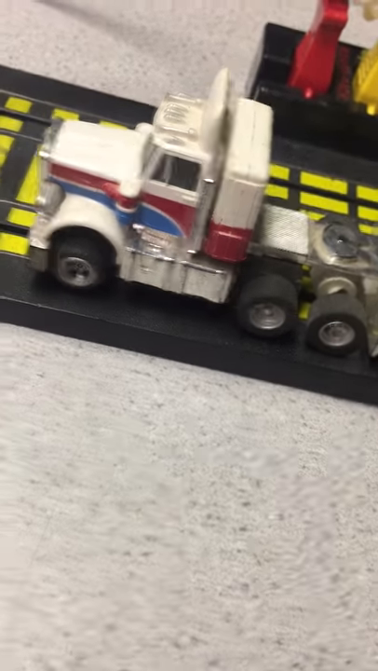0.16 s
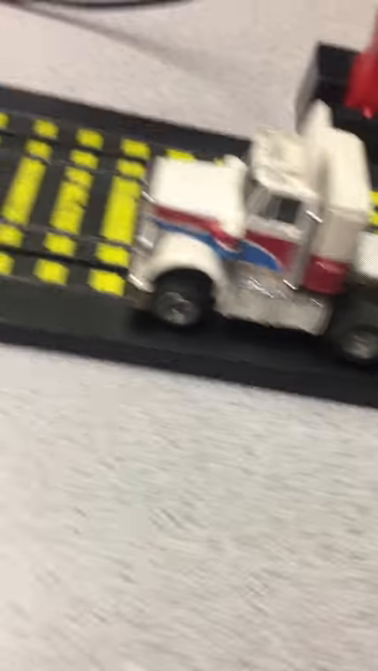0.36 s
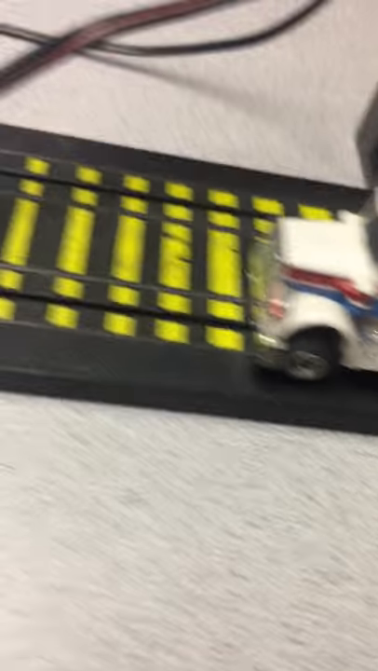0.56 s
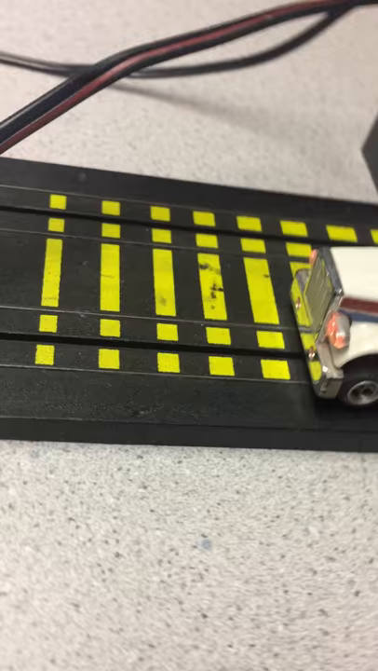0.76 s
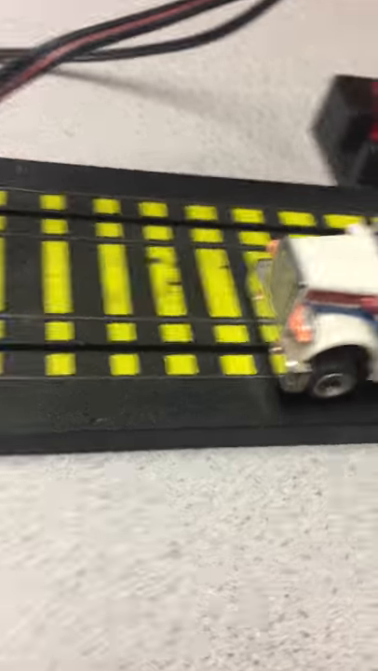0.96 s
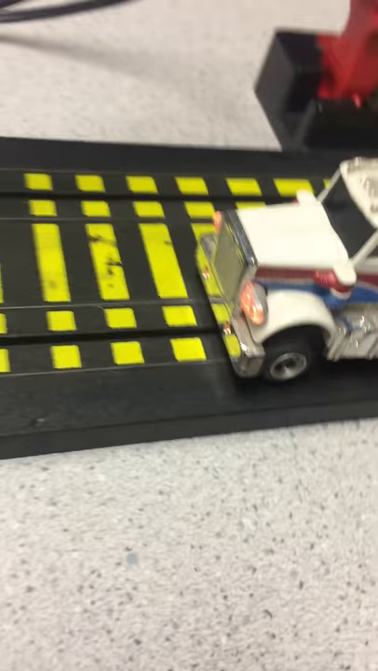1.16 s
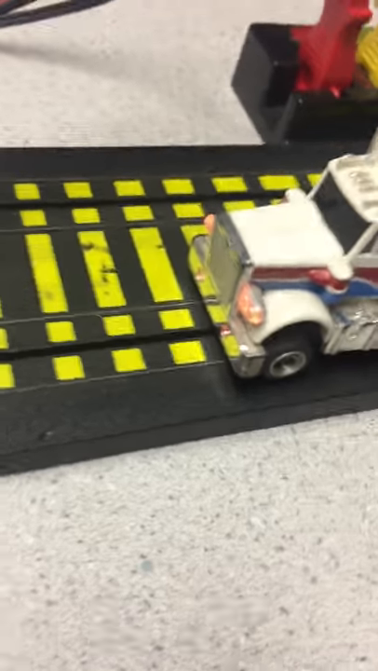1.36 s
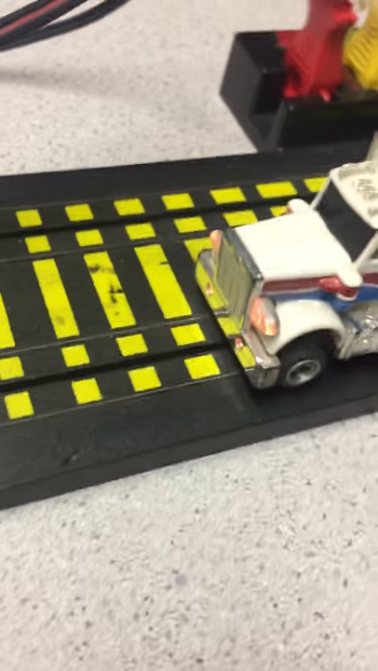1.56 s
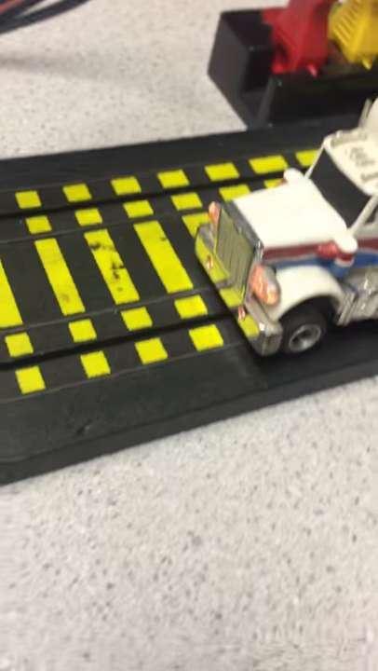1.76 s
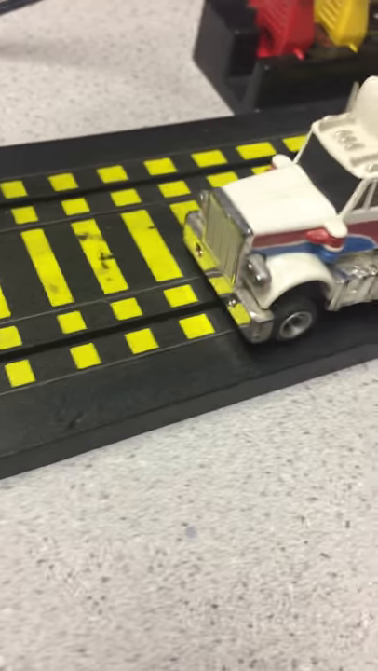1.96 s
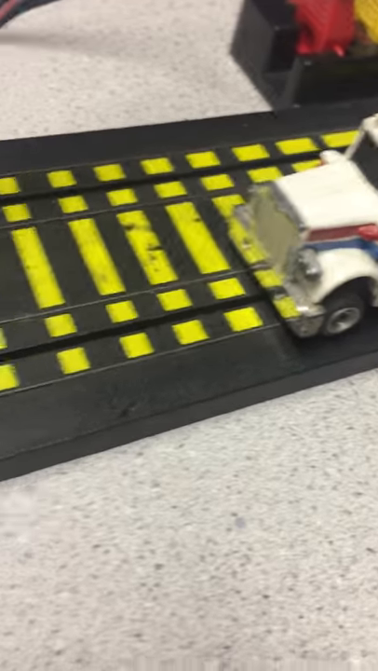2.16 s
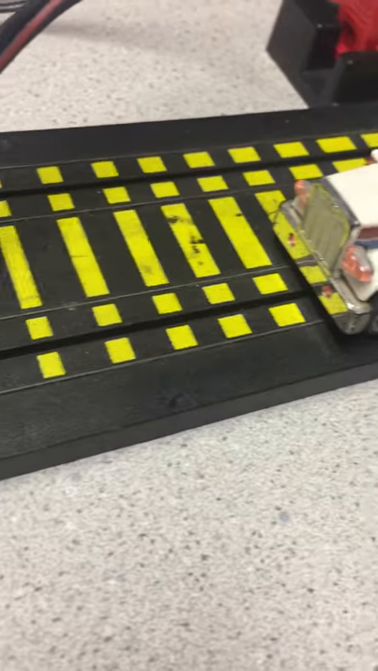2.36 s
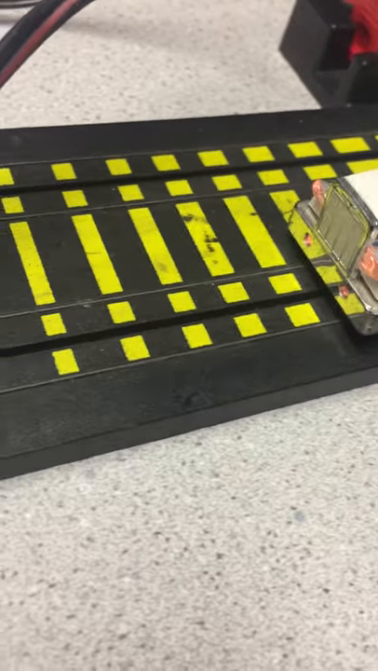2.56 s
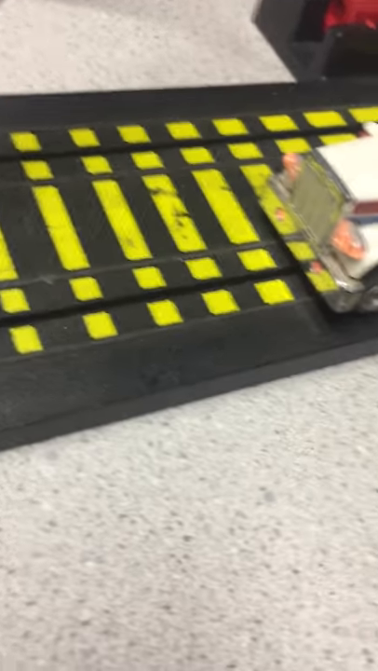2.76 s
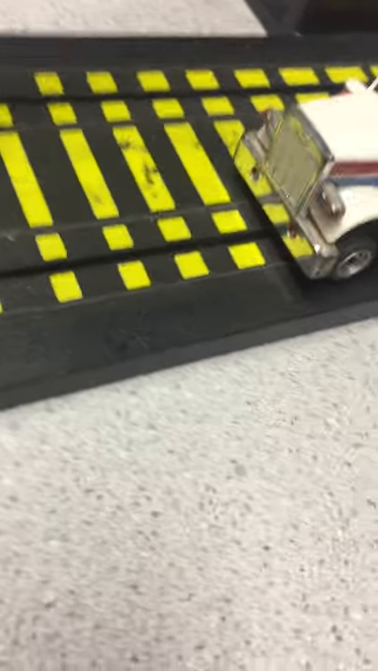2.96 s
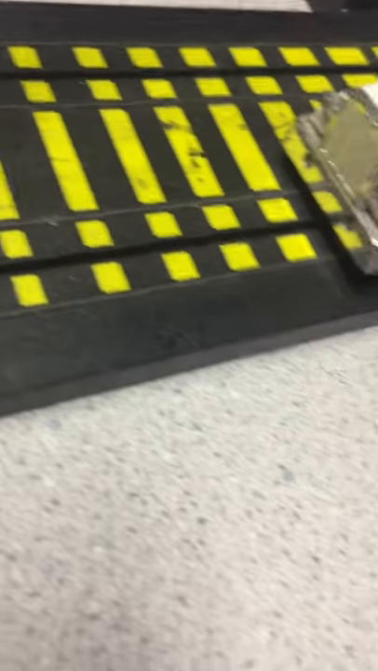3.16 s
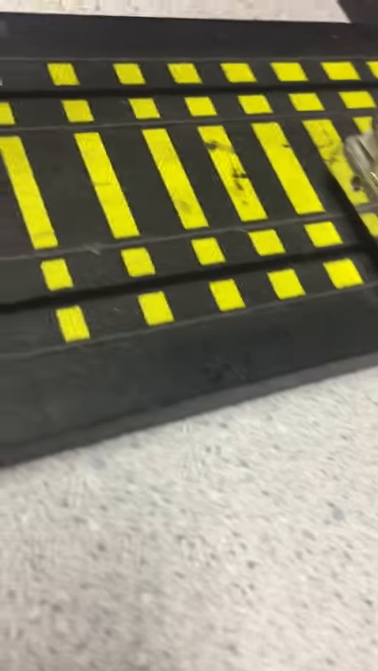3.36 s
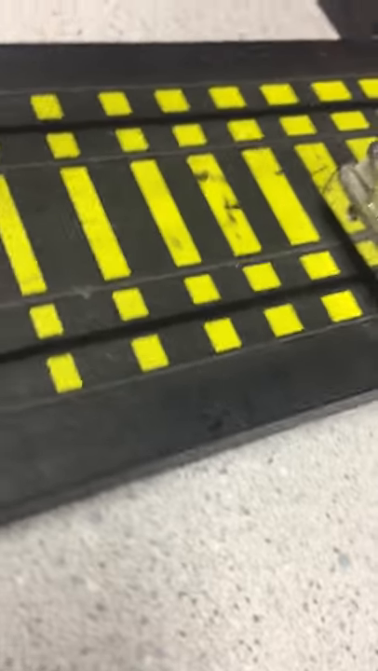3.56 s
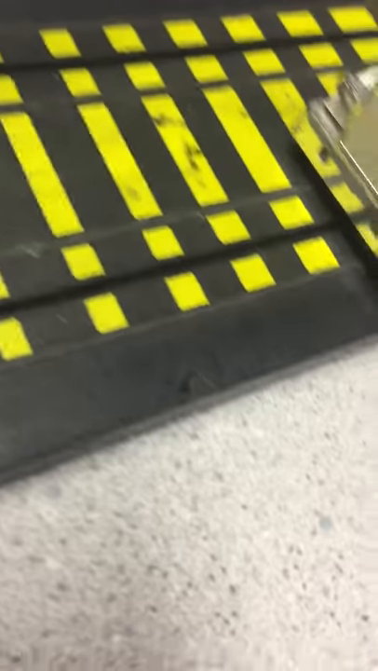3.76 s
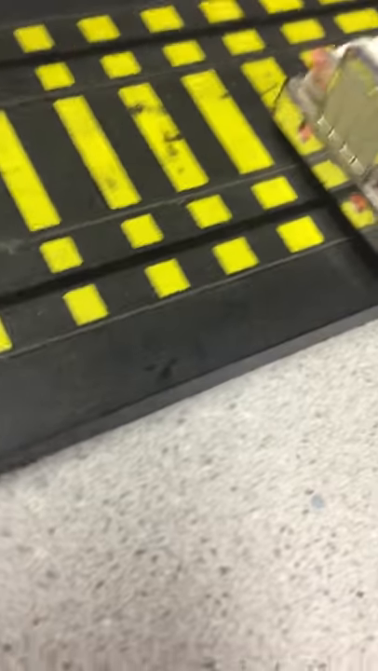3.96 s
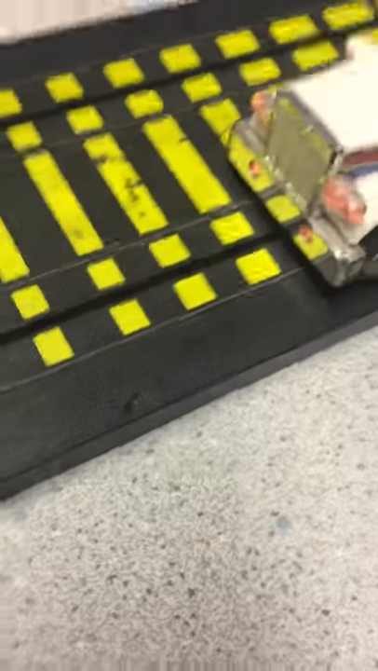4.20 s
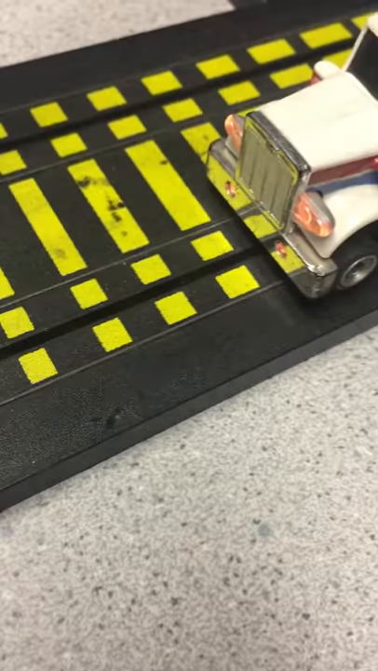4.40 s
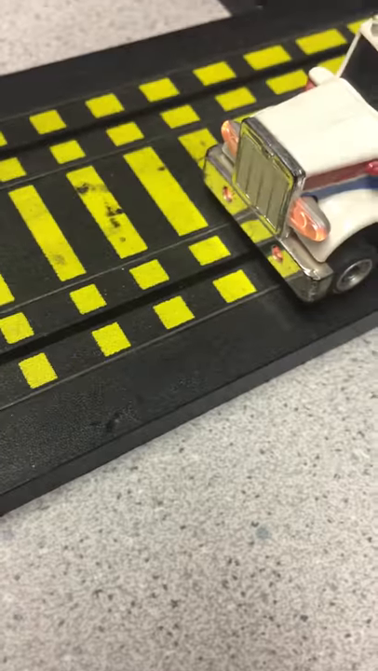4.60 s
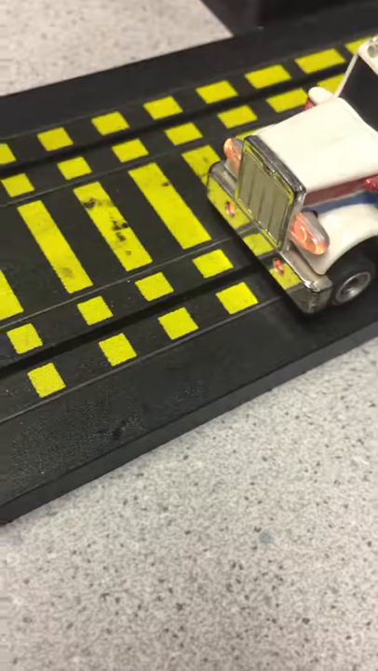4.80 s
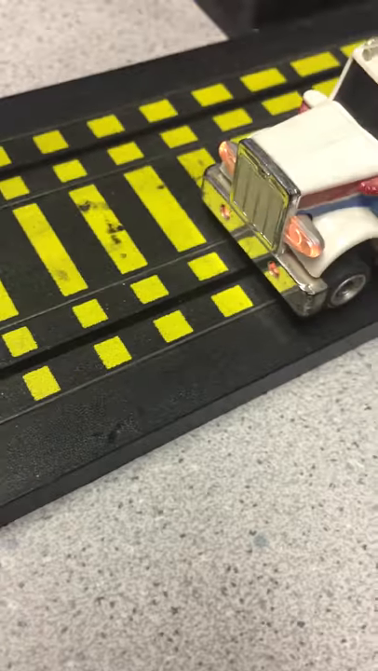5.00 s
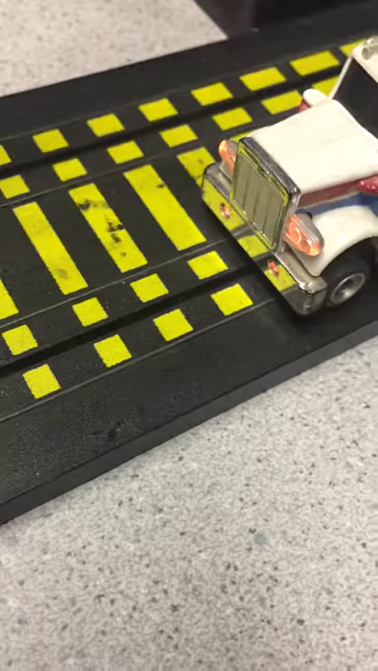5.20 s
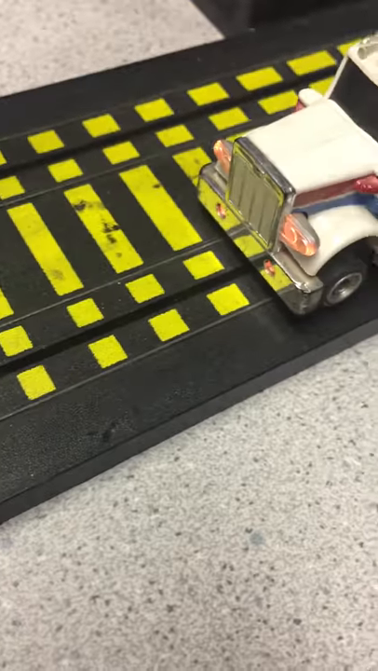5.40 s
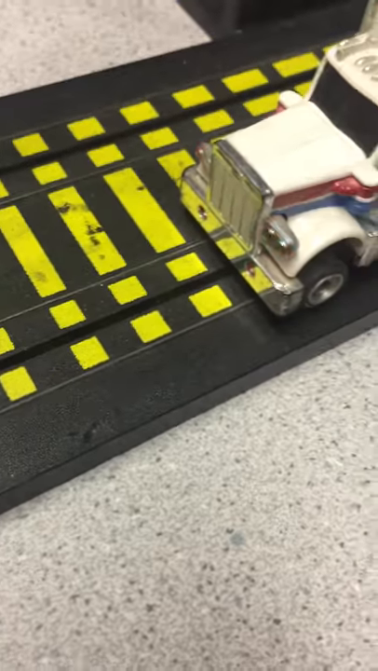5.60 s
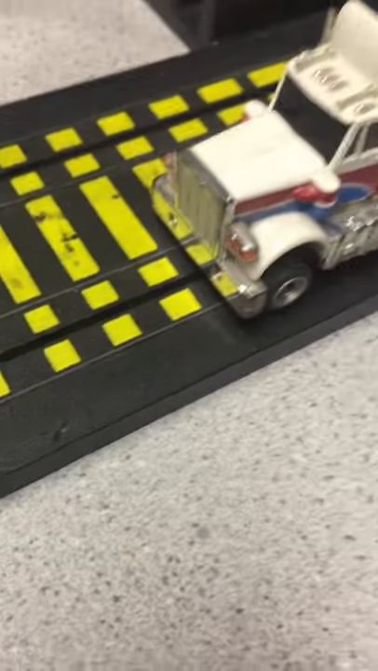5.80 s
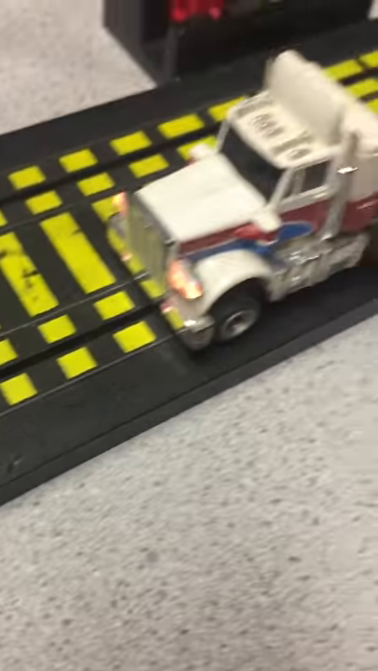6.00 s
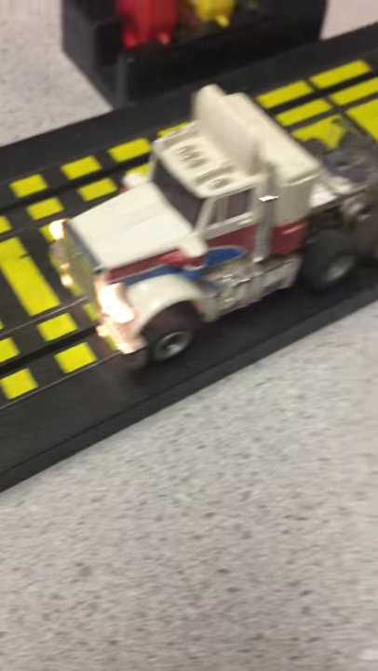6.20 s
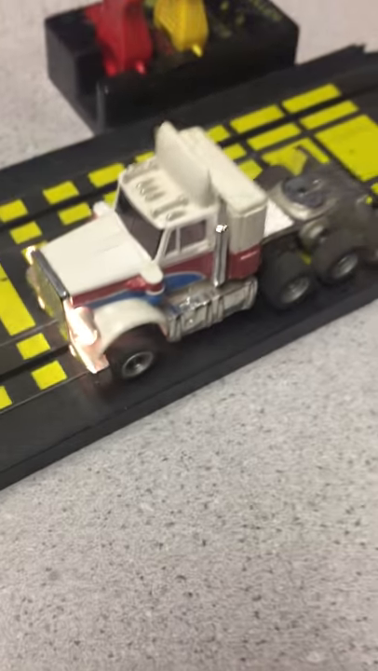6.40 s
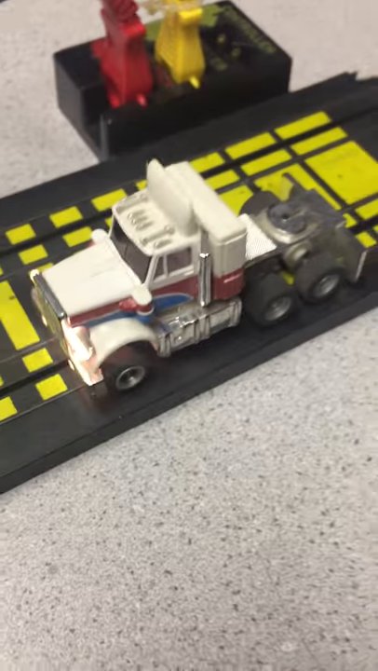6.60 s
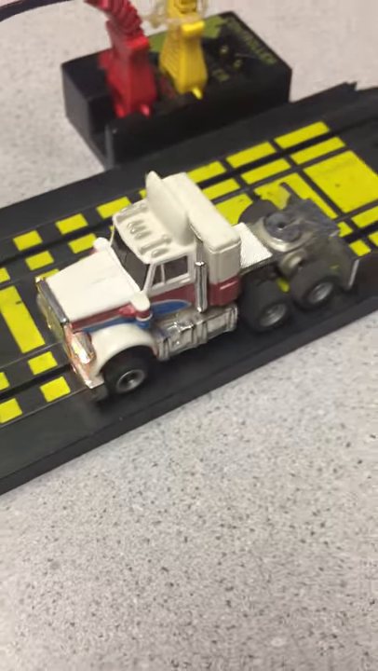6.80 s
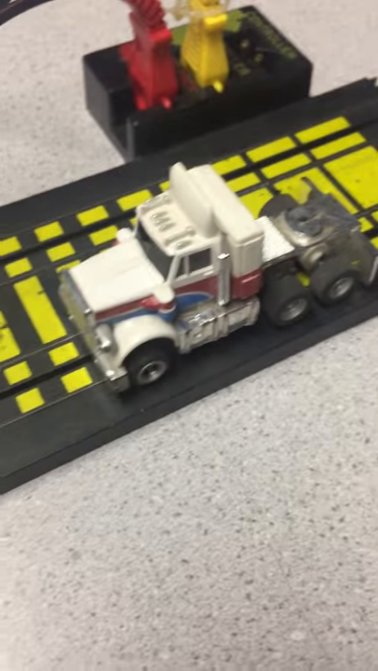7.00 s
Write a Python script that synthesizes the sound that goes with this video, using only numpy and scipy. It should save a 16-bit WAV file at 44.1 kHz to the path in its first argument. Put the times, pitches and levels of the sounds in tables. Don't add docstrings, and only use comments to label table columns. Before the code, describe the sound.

Close phone microphone, dry indoor sound. A tiny motor and loose plastic gears make a dry, noisy, bright rattle in five bursts, each spinning up fast and coasting down into slower ticking. Between bursts there is near silence with light gear taps, faint rubbing, one knock and a low creaking. Soft hiss and rumble lie underneath.

```python
import sys
import numpy as np
from scipy import signal
from scipy.fft import rfft, irfft, next_fast_len
from scipy.io import wavfile
from scipy.ndimage import uniform_filter1d, map_coordinates

SR = 44100
rng = np.random.default_rng(int(sys.argv[2]) if len(sys.argv) > 2 else 0)


def transcribe(u):
    v = np.clip(np.atleast_2d(u).T, -1, 1)
    q = np.round(v * 32767).astype(np.int16)
    wavfile.write(sys.argv[1], SR, q)


def ratio_of_db(decibels):
    return 10 ** (np.asarray(decibels, float) / 20)


N = 310921
T = np.arange(N) / SR

# (wheels grip [s], power off [s], standstill [s], spin-up time [s], free-spin speed [0-1])
RUNS = [
    (0.027, 0.199, 0.32, 0.21, 0),
    (0.658, 1.952, 2.1, 0.22, 0.03),
    (2.393, 2.996, 3.213, 0.18, 0.01),
    (3.996, 5.603, 5.792, 0.24, 0.01),
    (5.937, 6.96, 7.355, 0.25, 0),
]
# (shell at full speed [dB], then re shell: boom, chassis, fizz [dB])
FACING = [(-31.5, -7.5, -8, 1.5), (-31, -10.5, -9.5, -1), (-30, -10.5, -9, -0.5), (-32.5, -11, -5, 0.4),
          (-27.5, -12, -5, 2)]
# (frequency [Hz], width [Hz], level [dB])
BODY_MODES = [
    [(620, 67, -18), (882, 36, -3.5), (1210, 25, -3), (1470, 81, -3), (2350, 110, 0), (3480, 250, 0.5),
     (4100, 55, 1.5)],
    [(334, 8.1, -4), (611, 45, 3), (855.6, 31, 4.5), (1208, 37, -6.5), (1467, 64, -2), (2460, 300, -5.5),
     (3470, 140, 2)],
    [(622, 39, -0.5), (871, 25, 1.5), (1215, 48, -6.5), (1468, 46, -1.0), (2340, 200, -6.0),
     (3510, 90, 3.0)] + [(344, 30, -24)],
    [(208, 47, -15.5), (637, 48, -6.5), (867.0, 25, -1.5), (1183, 116, -8.0), (1477, 31, -3.0),
     (1970, 24, -10.0), (3490, 130, -1.5)] + [(331.6, 18, -13.0), (2700, 880, -16)],
    [(213.3, 49, -14.5), (640, 45, -9.0), (861, 30, -1.5), (1200, 116, -5.0), (1465, 54, -1),
     (1840, 75, -10.5)] + [(347, 31, -15), (3490, 180, -1.5), (4570, 140, -7.5)],
]
# (frequency [Hz], width [Hz], level [dB])
PLATE_BOOM = (198, 44, -22)
# (frequency [Hz], level [dB])
BROAD_BASE = [(60, -66), (150, -33), (400, -34), (560, -8.5), (1000, -29.5), (2000, -11), (3200, -8),
              (4500, -13.5), (8000, -14), (10000, -14), (12000, -18), (14000, -19.5), (16000, -17.5)]
# (frequency [Hz], width [Hz], gain [dB])
NOTCHES = [(992, 55, 5), (1678, 180, -4.5), (4825, 340, -7.5), (10240, 520, -5)]
EDGES_HZ = [130, 1000, 2300, 4800, 20000]
# (time [s], peak level [dB])
SNAPS = [(0.058, -27), (0.0982, -35), (0.1658, -24), (0.6624, -35), (2.396, -36), (2.4575, -21),
         (2.4793, -21), (2.5298, -18.5), (2.808, -17), (3.0062, -15.5), (4.0, -39), (4.0467, -24),
         (4.115, -17), (6.008, -27), (6.0666, -19), (6.2912, -9.5), (6.331, -24)]
# (time [s], level over the rattle
# [dB])
BITES = [(-0.0005, 8), (0.1865, 1), (0.7424, 9.5), (0.8004, 9), (0.8241, 10), (0.8609, 6.5), (0.9224, 8),
         (0.971, 3), (1.014, 2), (1.023, 9), (1.1407, 4.3), (1.3063, 4.5), (1.4773, 5), (1.4944, 6),
         (1.532, 8), (1.551, 6), (1.6043, 8), (1.636, 8), (1.6428, 4), (1.6824, 7), (1.7175, 5.3),
         (1.8664, -2), (2.0254, 8), (2.4183, 2), (2.4351, 5), (2.6246, 1.5), (2.8378, 2.5), (2.8532, 9),
         (3.0529, 6.5), (3.1058, 10.5), (4.0239, 5.5), (4.2223, 2.5), (4.3478, 6), (4.5605, -6),
         (4.5724, 1), (4.5812, 2), (4.7748, 7), (4.8885, 5.1), (4.922, 4), (4.9769, 4.4), (5.0353, 7),
         (5.1047, 4.3), (5.1676, 8.5), (5.2538, 4.7), (5.2598, 1), (5.3667, 4), (5.4264, 2), (5.4964, 7),
         (5.5344, -2), (5.59, 7), (5.6347, 9), (5.75, -4), (5.7679, 11), (6.1143, 6), (6.239, 8),
         (6.2538, 10), (6.4122, 1), (6.8669, 5), (6.9427, 7.5), (7.0188, 7.5),
         (0.2111, -6), (0.232, 6), (0.6716, -3), (0.7514, 3.5), (0.8771, 3.9), (0.8968, 9), (1.092, -2),
        (1.166, 3.6), (1.1887, 3.5), (1.206, 2), (1.24, -2), (1.2797, 6.5), (1.315, 3.7), (1.3634, 3.6),
        (1.431, 5), (1.753, 3.8), (1.8162, 10), (1.8247, 5), (1.931, 5), (1.942, 2), (1.9763, -4),
        (2.4699, 11), (2.656, 5), (2.7325, 2), (2.7806, 6), (2.9063, 5), (4.0957, 3.6), (4.1794, 2),
        (4.238, 6), (4.2648, 5.5), (4.3793, -1), (4.4082, 3), (4.4825, -3), (4.5243, -5), (4.6986, 3.7),
        (4.723, 6), (4.8095, 6.5), (4.8245, 7), (4.9053, 0), (5.1159, 3.7), (5.1382, 2), (5.1996, -2),
        (5.2235, 1.5), (5.3255, 7), (5.3498, 7), (5.3903, 3.4), (5.4053, 2), (5.5574, 4.1), (5.6076, 3),
        (5.6726, 6), (5.948, 8), (6.0452, 6), (6.0931, 7), (6.1977, 5), (6.214, 3.8), (6.383, 6.5),
        (6.5728, 7), (6.5787, 10), (6.696, -2), (6.7497, 2)]
# (time [s], level over the rattle [dB])
TICKS = [(0.022, 4), (.036, 2), (0.049, 7), (.663, 7), (.692, 10), (0.709, 7.5), (2.04, 10.5), (2.053, 10),
         (2.068, 12.5), (2.081, 8), (2.102, 6), (2.112, 7), (2.378, 6.5), (2.407, 10), (2.413, 14),
         (3.018, 2), (3.072, 5), (3.131, 7), (3.152, 5.5), (3.16, 6), (3.171, -1.5), (4.01, 7.5),
         (4.016, -6), (4.032, -2), (5.703, 7.5), (5.743, -1), (5.783, 4), (5.899, 8), (5.911, 18),
         (5.956, 7), (5.971, -2), (6.0, -8), (6.017, 12), (6.038, 0.5)]
# (time [s], gain [dB])
NEARNESS = [(0, -0.3), (1.0, 0.43), (1.45, -0.3), (2.0, -1), (2.6, -1.34), (3.1, -1.8), (4.2, 1.4),
            (4.9, 0), (5.7, 0), (5.95, -8), (6.12, 0.5), (6.3, 1.5), (6.55, 0), (6.8, -0.4), (7.05, -3.5)]
# (frequency [Hz], width [Hz], gain [dB])
LOBES = [
    [(6740, 600, 1.5), (8500, 640, 1), (10500, 500, -2), (12800, 600, -2)],
    [(2930, 440, -4), (5170, 370, 1.5), (5710, 310, -3.5), (6300, 1100, 1.5), (7700, 400, -2),
     (8500, 710, 3), (11300, 500, -0.5), (12600, 730, -0.5), (15500, 730, 3.5)],
    [(5130, 300, 2), (6250, 480, 1), (7570, 430, -1.5), (8700, 680, 2), (11400, 500, -0.5),
     (12300, 500, -1.5), (15800, 400, 1)],
    [(5550, 540, 1), (6640, 490, -1.5), (7900, 350, -3.5), (8860, 590, 2), (11600, 450, -3.5),
     (12400, 500, 1.5), (13330, 700, 4), (13200, 370, -7.5), (15400, 370, 1.5)],
    [(1450, 590, -1.5), (1830, 650, 3), (2500, 270, -0.5), (3010, 350, 3.5), (4480, 430, 1.5),
     (5770, 370, 0.5), (7800, 400, -0.5), (8360, 600, 0.5), (11500, 600, -1), (15300, 660, 3)],
]
# (time [s], stretch [%])
SLIDE = [(0, 0), (.65, -5), (1.15, 0), (1.6, 1), (2.1, -2), (2.4, -3), (2.85, 0), (3.18, 8), (4.0, 10),
         (4.25, 5), (4.45, 2), (5, 0), (5.75, -2), (5.95, 13), (6.3, 3), (6.55, -5), (7.05, -12)]
# (time [s], half length [s], frequency [Hz], width [Hz], gain
# [dB])
COLOUR_SHIFTS = [(6.3, 0.17, 3200, 260, 8), (6.5, 0.058, 1870, 360, 8), (6.3, 0.09, 6000, 500, 7),
                 (6.58, 0.32, 12800, 8100, 6.5), (6.9, 0.34, 3680, 230, 6), (1.9, .3, 10000, 600, 6.5),
                 (2.45, .12, 16000, 500, 0.5), (7, 0.049, 3500, 380, 4.5), (6.6, .05, 13000, 7100, -8.5),
                 (1.7, 0.14, 7500, 3600, 4), (6.57, 0.045, 2900, 240, 3), (6.75, 0.058, 3400, 400, 6),
                 (6.36, 0.032, 1700, 440, 7.5), (6.9, 0.34, 1960, 500, -3), (6.58, 0.038, 1630, 530, 9),
                 (6.9, 0.052, 3600, 280, 1), (2.79, 0.12, 3300, 700, 3.5), (2.6, 0.16, 190, 250, 9),
                 (2.0, .1, 200, 200, 9.5), (0.87, .3, 300, 200, -4.5), (4.1, 0.07, 300, 320, 7.5),
                 (7.0, 0.024, 350, 360, 9.5), (7.1, 0.058, 9000, 4000, -0.5), (5.3, 0.71, 2100, 470, 2.5),
                 (6.5, 0.12, 3100, 350, 0.5), (6.6, .1, 8500, 3400, 2.5), (6.6, 0.12, 4300, 1000, 2)]
# (time [s], peak level [dB],
# tick level [dB], edge level [dB], ring frequency [Hz])
SLACK = [(0.0001, -41, 5, -3, 2260), (.023, -47, -16, -20, 3600), (.036, -33, -15, -12, 3500),
         (0.6118, -31, -18, -13, 3230), (.6125, -34.5, -25, -25, 2350), (.663, -36, 2, 2, 3460),
         (.672, -40, 0, 2, 3500), (2.068, -46, -5, 6, 3500), (2.081, -48, -3, 5, 3620),
         (2.101, -62, 0, 5, 3600), (2.406, -42, 7, 7, 3500), (3.132, -48, 2, 7, 3670),
         (3.161, -50, -5, 4, 3600), (3.172, -50, -10, -6, 3650), (3.361, -63, 0, 3, 2400),
         (4.024, -38, 2, 0, 3400), (5.899, -38, -20, -28, 1110), (5.911, -55, -15, -22, 3420),
         (5.943, -48, 2, 4, 3400), (5.957, -49, 2, 2, 3400), (2.3484, -28, -5, -18, 3280),
         (3.187, -56, 2, 3, 3470), (3.322, -63, -7, -5, 3980), (3.323, -31, 0, -1, 2900),
         (3.349, -38.5, -3, -18.5, 3070), (3.962, -42, -9, -10, 3050), (3.9676, -40, 3, -3, 3490),
         (5.7965, -56, 2, -3, 3450), (5.768, -48, -5, 6, 3440), (5.878, -28.5, -7, -15, 3130),
         (5.8845, -32, -6, -11, 3380)]
# (time [s], level [dB], frequency [Hz])
LURCH = [
    (0.035, -51, 900),
    (2.396, -57, 1130),
    (3.997, -46, 1250),
    (5.938, -39, 1040),
]
# (time [s], peak level [dB])
KNOCK = [
    (3.144, -18.5),
    (3.152, -37),
    (5.86, -52),
]
# (frequency [Hz], level [dB], 60 dB decay time [s])
PLATE = [(126, -2, 0.053), (226, 1, 0.069), (464, 19.5, 0.014), (570, -8, 0.025)]
# (time [s], level [dB], ring frequency [Hz])
CREAK = [(3.33, -63.5, 245), (3.43, -58, 252), (3.458, -58, 250), (3.518, -48, 265), (3.596, -60.5, 254),
         (3.688, -45.5, 205), (3.72, -88, 204)]
# (time [s], peak level [dB], upper ring level [dB])
SLIPS = [(3.38, -47, -20), (3.416, -39.5, -17), (3.479, -48, 2), (3.489, -49.5, 6), (3.509, -46.5, -16),
         (3.54, -41, -17), (3.601, -42, -10.5), (3.623, -52, 5), (3.638, -45.5, -4), (3.675, -48, -11),
         (3.706, -65, -11)]
# (start [s], end [s], first level [dB], last level [dB])
RUB = [
    (0.31, 0.644, -76, -68),
    (3.21, 3.56, -69.5, -81),
    (3.5, 3.725, -80, -78),
]
# (frequency [Hz], width [Hz], level [dB])
RUB_TONE = [(9100, 13000, -3), (3120, 370, -3)], [(1120, 140, -1), (2630, 770, -20)], [(1710, 440, 0)]
# (frequency [Hz], density [dB per Hz])
AIR = [(100, -18), (190, -8), (230, -15.5), (520, -22), (720, -21), (830, -13.5), (950, -18), (2500, -25),
       (4900, -28), (5800, -27.5), (7000, -30), (11000, -32), (14500, -33.5), (15800, -38)]
# (frequency [Hz], density [dB per Hz])
RUMBLE = [(15, -45), (28, -28), (40, -13), (65, 7), (85, -1), (120, 3), (170, -25), (300, -63.5)]
# (time [s], half length [s], rumble level [dB])
HANDLING = [(0.123, 0.13, -59), (0.973, 0.18, -69), (1.327, 0.065, -68), (2.5, 0.27, -68),
            (3.12, 0.077, -72), (4.096, 0.18, -67), (4.698, .3, -65), (5.032, 0.085, -66), (5.8, 0.82, -66),
            (6.528, 0.1, -56), (7.0, 0.16, -64)]

SHELL_POWER, BOOM_POWER, CHASSIS_POWER, FIZZ_POWER = 0.72, 0.51, 0.57, 1
CHASSIS_DB_PER_STRETCH = 0.1556
LEAD_S, GRIP_S = 0.034, 0.0099
COAST_POWER, CHATTER_DB = 1.82, 3
SETTLE_S, SETTLE_SPEED = 0.007, 0.003
SLOW_SPEED = 0.3
CATCH_S, CATCH_DB = 0.00056, -1.5
SWAY_S, SWAY_RATE = 0.00035, 40
SPARK_RATE, SPARK_S, SPARK_DB, SPARK_HZ = 60, 0.0003, -10.5, 11000
SNAP_HZ, SNAP_BRIGHTER, SNAP_T60_S = 5500, 0.45, 0.008
STIR_S, STIR_DB = 0.012, -36
SHAFT_S, SHAFT_HZ, SHAFT_HZ_PER_S, SHAFT_SPAN_S = 4.37, 205, 230, 0.31
TRACK_MODE_WIDTH_HZ, SHAFT_DB = 15, -44
HUM_FROM_S, HUM_DB, HUM_FADE_DB_PER_S = 4.05, -61, 1
ROOM_DB, HUSH_DB = -76.5, -71.5
TOP_HZ = 15920


def unit(x):
    return x / np.sqrt(np.mean(x ** 2) + 1e-20)


def along(points, hz):
    f, v = np.transpose(points)
    return np.interp(np.log(hz + 1), np.log(f + 1), v)


def curves(rows, t):
    s, *cols = np.transpose(rows)
    return [np.interp(t, s, c) for c in cols]


def wobble(rate, size):
    knots = rng.standard_normal(int(size * rate / SR) + 4)
    return map_coordinates(knots, [np.arange(size) * rate / SR])


def noise_like(x):
    return rng.standard_normal(len(x))


def decaying_sine(t, hz, t60):
    return ratio_of_db(-60 * t / t60) * np.sin(2 * np.pi * hz * t)


def filtered(x, gain):
    m = 2 * next_fast_len(len(x) // 2 + 4096)
    cep = irfft(np.log(gain(np.fft.rfftfreq(m, 1 / SR)) + 1e-6), m)
    cep[1:m // 2] *= 2
    cep[m // 2 + 1:] = 0
    return irfft(rfft(x, m) * np.exp(rfft(cep)), m)[:len(x)]


def bell(hz, centre, width):
    return 1 / (1 + (2 * (hz - centre) / width) ** 2)


def add(track, s, sound):
    part = track[max(round(s * SR), 0):][:len(sound)]
    part += sound[:len(part)]


def truck():
    out = np.zeros(N)
    for run, facing, modes, lobes in zip(RUNS, FACING, BODY_MODES, LOBES):
        grip, off, stop, *spin = run
        full_db, boom_db, chassis_db, fizz_db = facing
        end = stop + 3 * SETTLE_S
        t = T[(T > grip - LEAD_S) & (T < end)]
        v = speed(t, grip, off, stop, *spin)
        level_db = full_db + curves(NEARNESS, t)[0]
        drive = teeth(t, v, level_db + 20 * SHELL_POWER * np.log10(v), full_db=-37.0)
        sound = interference(filtered(drive, body(modes)), t, lobes)
        boom, chassis, shell, fizz = bands(sound)
        contact = unit(ratio_of_db(0.6 * wobble(90, len(t)) + 1.9 * wobble(350, len(t))))
        fizz = contact * fizz + ratio_of_db(SPARK_DB) * arcs(len(t))
        chassis_db = chassis_db + CHASSIS_DB_PER_STRETCH * curves(SLIDE, t)[0]
        fizz_db = fizz_db + CHATTER_DB * np.clip((t - off) / (stop - off), 0, 1)
        mix = ratio_of_db(boom_db) * v ** BOOM_POWER * boom
        mix = mix + ratio_of_db(chassis_db) * v ** CHASSIS_POWER * chassis
        mix = mix + v ** SHELL_POWER * shell
        mix = mix + ratio_of_db(fizz_db) * v ** FIZZ_POWER * fizz
        fade = np.clip(np.minimum(t - t[0], end - t) / 0.016, 0, 1)
        add(out, t[0], ratio_of_db(level_db) * mix * fade)
        for s, db in SNAPS:
            if t[0] < s < t[-1]:
                add(out, s, ratio_of_db(db) * hard_blow(db, modes))
    return out


def speed(t, grip, off, stop, spin_up_s, free):
    pulled = np.clip(np.minimum(t, off) - grip, 0, None)
    up = (1 - np.exp(-pulled / spin_up_s)) * (1 - np.exp(-pulled / GRIP_S))
    coast = np.clip((stop - np.maximum(t, off)) / (stop - off), 0, 1) ** COAST_POWER
    settle = SETTLE_SPEED * np.exp(-np.abs(t - stop) / SETTLE_S)
    return np.maximum(up, free) * coast + settle + 1e-5


def teeth(t, v, level_db, full_db):
    size = len(t)
    rate = np.clip(900 * ratio_of_db(level_db - full_db), 420, 3000)
    size_db = np.clip(5 * rng.standard_normal(size), -12, 5)
    blows = (rng.random(size) < rate / SR) * ratio_of_db(size_db) ** 2 * SR / rate
    decay = T[:600] * np.exp(-T[:600] / 0.00063)
    power = np.abs(signal.fftconvolve(blows, decay)[:size])
    sliding = 0.45 + 0.4 * np.clip(1 - v / SLOW_SPEED, 0, 1)
    catches = np.zeros(size)
    u = T[:600] / CATCH_S
    for s, db in [*BITES, *TICKS]:
        if t[0] < s < t[-1]:
            add(catches, s - t[0], ratio_of_db(db + CATCH_DB) ** 2 * u * np.exp(1 - u))
    swell = ratio_of_db(0.037 * wobble(16.1, size) + 0.09 * wobble(59.86, size))
    total = sliding + (1 - sliding) * power / power.mean() + catches
    return swell * np.sqrt(total) * rng.standard_normal(size)


def body(modes):
    def gain(hz):
        peaks = sum(ratio_of_db(db) ** 2 * bell(hz, c, w) for c, w, db in [*modes, PLATE_BOOM])
        dips_db = sum(db * bell(hz, c, w) for c, w, db in NOTCHES)
        return np.sqrt(peaks + ratio_of_db(along(BROAD_BASE, hz)) ** 2) * ratio_of_db(dips_db)
    return gain


def interference(x, t, lobes):
    hz, s, z = signal.stft(x, SR, nperseg=256)
    hz, s = hz[:, None], s + t[0]
    stretch = 1 + curves(SLIDE, s)[0] / 100
    gain_db = np.zeros(z.shape)
    for c, w, db in lobes:
        centre = c * (stretch if c < 15000 else 1)
        gain_db += 2 * db * bell(hz, centre, 1.45 * w) ** 2
    for at, half, c, w, db in COLOUR_SHIFTS:
        gain_db += db * bell(hz, c, w) * np.exp(-((s - at) / half) ** 2)
    field = uniform_filter1d(rng.standard_normal(z.shape), size=5, axis=0)
    field = uniform_filter1d(field, size=20, axis=1)
    gain_db += 0.7 * unit(field) * (hz > 1500)
    return signal.istft(z * ratio_of_db(gain_db), SR, nperseg=256)[1][:len(x)]


def bands(sound):
    size = len(sound)
    spec, hz = rfft(sound), np.fft.rfftfreq(size, 1 / SR)
    below = [1 / (1 + (hz / edge) ** 16) for edge in EDGES_HZ]
    parts = [unit(irfft(spec * (hi - lo), size)) for lo, hi in zip(below, below[1:])]
    rocked = np.arange(size) + SR * SWAY_S * wobble(SWAY_RATE, size)
    parts[:2] = [map_coordinates(p, [rocked], mode="nearest") for p in parts[:2]]
    return parts


def arcs(size):
    jumps = (rng.random(size) < SPARK_RATE / SR) * ratio_of_db(3.7 * rng.standard_normal(size))
    shape = np.abs(signal.fftconvolve(jumps, T[:200] * np.exp(-T[:200] / SPARK_S))[:size])
    return unit(filtered(shape * rng.standard_normal(size), lambda f: f ** 4 / (f ** 4 + SPARK_HZ ** 4.0)))


def hard_blow(db, modes):
    t = T[:2000]
    top = SNAP_HZ * ratio_of_db(SNAP_BRIGHTER * (db + 16))
    radiation = body(modes)
    dull = lambda f: radiation(f) / (1 + (f / top) ** 2) * f ** 2 / (f ** 2 + 2000 ** 2)
    burst = ratio_of_db(-60 * t / SNAP_T60_S) * (1 - np.exp(-t / 0.0016)) * noise_like(t)
    blow = filtered(burst, dull)
    return blow / np.abs(blow).max()


def decaying_noise(t, t60, gain):
    return unit(filtered(noise_like(t), gain)) * ratio_of_db(-60 * t / t60)


def slack():
    out, t = np.zeros(N), T[:4000]
    touch_gain = lambda f: bell(f, 4400, 4700) ** 2 * f ** 4 / (f ** 4 + 1900.0 ** 4)
    touch = filtered(1.0 * (t == 0), touch_gain)
    touch = touch / np.abs(touch).max()
    for s, db, tick_db, edge_db, hz in SLACK:
        ring = decaying_sine(t, hz, 0.018) + 0.24 * decaying_sine(t, 2406, 0.032)
        ring = ring + 0.5 * decaying_noise(t, 0.013, lambda f: bell(f, 3580, 2200) ** 2)
        tick = 0.87 * decaying_noise(t, 0.01, lambda f: bell(f, 5560, 3560) ** 2)
        tick = ratio_of_db(tick_db) * (tick + 0.64 * decaying_sine(t, 5180, 0.0094))
        edge = ratio_of_db(edge_db) * decaying_noise(t, 0.012, lambda f: f ** 8 / (f ** 8 + 5300.0 ** 8))
        after = ratio_of_db(-17.5) * decaying_noise(t, 0.058, lambda f: bell(f, 2500, 3500))
        add(out, s, ratio_of_db(db - 2.5) * (ring + tick + edge + after) * (1 - np.exp(-t / 0.001)))
        add(out, s + 0.0008, ratio_of_db(db + tick_db - 4.5) * touch)
        stir = decaying_noise(t, 1, lambda f: bell(f, 2900, 2500))
        stir = (t < STIR_S) * np.sqrt(t / STIR_S) * stir
        add(out, s - STIR_S, ratio_of_db(db + STIR_DB) * stir)
    return out


def lurch():
    out, t = np.zeros(N), T[:4000]
    for s, db, hz in LURCH:
        jolt = decaying_noise(t, 0.57, lambda f: bell(f, hz, 300) + 0.39 * bell(f, 2500, 1300))
        add(out, s, ratio_of_db(db) * jolt * (1 - np.exp(-t / 0.011)))
    return out


def knock():
    out, t = np.zeros(N), T[:8000]
    for s, db in KNOCK:
        ring = sum(ratio_of_db(g) * decaying_sine(t, hz, t60) for hz, g, t60 in PLATE)
        crack = ratio_of_db(-16) * decaying_noise(t, 0.012, lambda f: bell(f, 1400, 2200))
        add(out, s - 0.001, ratio_of_db(db) * crack)
        add(out, s, ratio_of_db(db - 11) * ring * (1 - np.exp(-t / 0.0049)))
    return out


def creak():
    out, t = np.zeros(N), T[:8000]
    for s, db, upper_db in SLIPS:
        low = decaying_sine(t, curves(CREAK, s)[1], 0.099)
        upper = ratio_of_db(upper_db) * decaying_sine(t, 530, 0.05)
        add(out, s, ratio_of_db(db - 4) * (low + upper) * (1 - np.exp(-t / 0.002)))
    small = (rng.random(N) < 220 / SR) * ratio_of_db(5.6 * rng.random(N)) * np.sign(noise_like(T))
    ringing = lambda f: bell(f, 255, 120) + 0.42 * bell(f, 530, 140) + 0.19 * bell(f, 350, 250)
    groan = unit(filtered(small, ringing))
    inside = (T > CREAK[0][0]) & (T < CREAK[-1][0])
    return out + inside * ratio_of_db(curves(CREAK, T)[0] - 7.5) * groan


def rub():
    out = np.zeros(N)
    for (start, end, first_db, last_db), tone in zip(RUB, RUB_TONE):
        touch = np.clip(np.minimum(T - start, end - T) / 0.028, 0, 1)
        hiss = filtered(noise_like(T), lambda f: sum(ratio_of_db(db) * bell(f, c, w) for c, w, db in tone))
        level_db = np.interp(T, [start, end], [first_db, last_db])
        level_db = level_db + 0.89 * wobble(40, N) + 1.5 * wobble(12, N)
        out = out + touch * ratio_of_db(level_db) * unit(hiss)
    return out


def walls(x):
    t = T[:SR // 4]
    tail = ratio_of_db(-60 * t / 0.09) * noise_like(t)
    tail = np.pad(tail / np.linalg.norm(tail), (300, 0))
    return signal.fftconvolve(x, tail)[:N]


def shaft():
    hz = SHAFT_HZ + SHAFT_HZ_PER_S * (T - SHAFT_S)
    crossing = (np.abs(T - SHAFT_S) < SHAFT_SPAN_S) * bell(hz, SHAFT_HZ, TRACK_MODE_WIDTH_HZ)
    return crossing * ratio_of_db(SHAFT_DB + 1.5 * wobble(28.4, N)) * np.sin(2 * np.pi * np.cumsum(hz) / SR)


def hum():
    on = np.clip((T - HUM_FROM_S) / 0.08, 0, 1)
    level_db = HUM_DB - 5.5 - HUM_FADE_DB_PER_S * (T - HUM_FROM_S) + 0.7 * wobble(9.5, N)
    return on * ratio_of_db(level_db) * np.sin(2 * np.pi * 120 * T)


def room():
    air = unit(filtered(noise_like(T), lambda f: ratio_of_db(along(AIR, f))))
    low = unit(filtered(noise_like(T), lambda f: ratio_of_db(along(RUMBLE, f))))
    shifts = sum(ratio_of_db(db) ** 2 * np.exp(-2 * ((T - s) / half) ** 2) for s, half, db in HANDLING)
    rumble = np.sqrt(ratio_of_db(ROOM_DB) ** 2 + shifts) * ratio_of_db(1.1 * wobble(7.1, N)) * low
    return ratio_of_db(HUSH_DB + 0.68 * wobble(44, N)) * air + rumble


def scene():
    near = truck() + slack() + lurch() + knock() + creak() + rub()
    return (near + ratio_of_db(-16) * walls(near) + shaft() + hum() + room())[None]


def roll_off(x):
    return signal.sosfilt(signal.butter(12, 17110, fs=SR, output="sos"), x)


def record(dry):
    edge = np.clip((TOP_HZ - np.fft.rfftfreq(N, 1 / SR)) / 200, 0, 1)
    kept = irfft(rfft(dry) * np.sin(edge * np.pi / 2) ** 2, N)
    return roll_off(kept)


dry = scene()
out = record(dry)
transcribe(out)
```